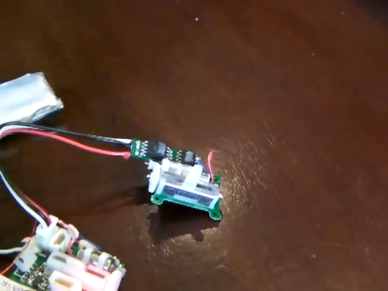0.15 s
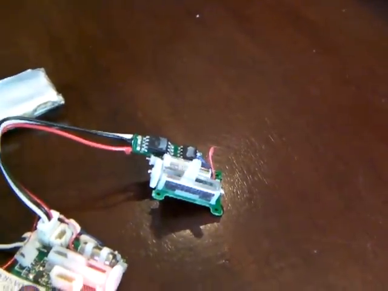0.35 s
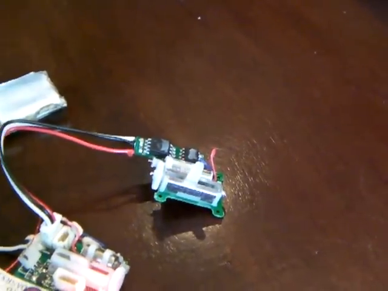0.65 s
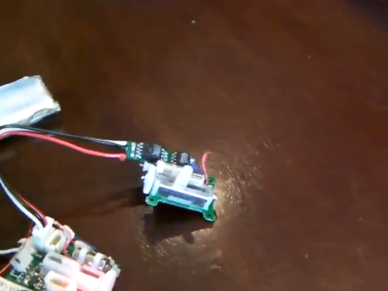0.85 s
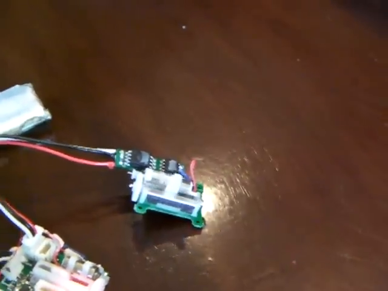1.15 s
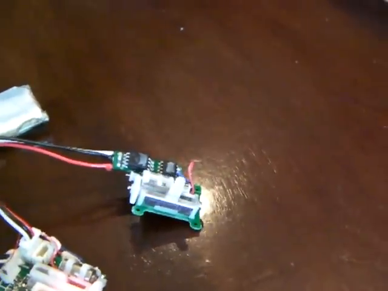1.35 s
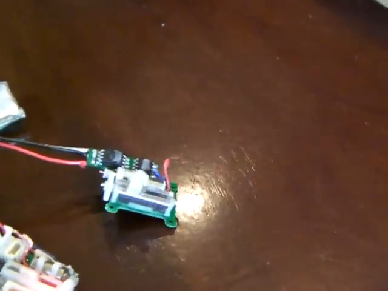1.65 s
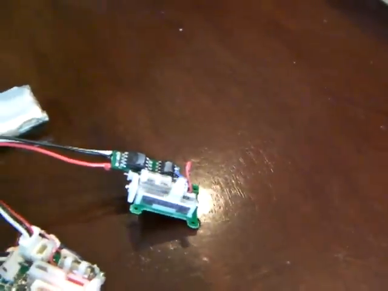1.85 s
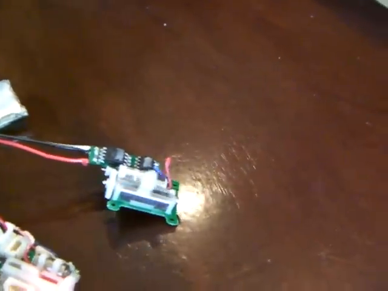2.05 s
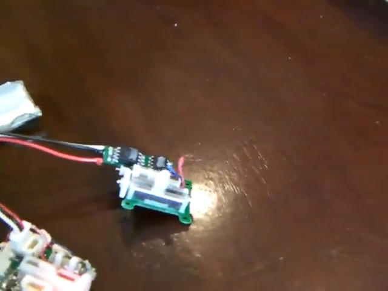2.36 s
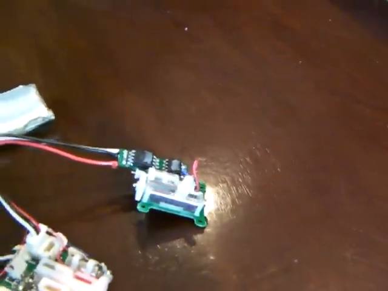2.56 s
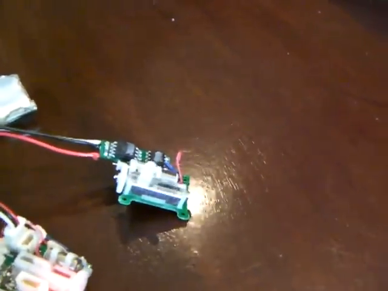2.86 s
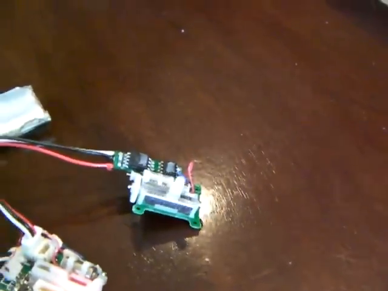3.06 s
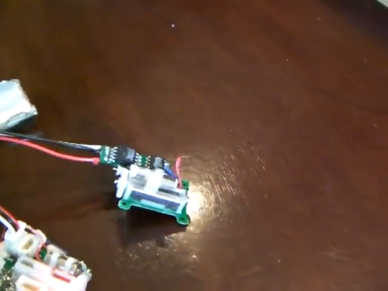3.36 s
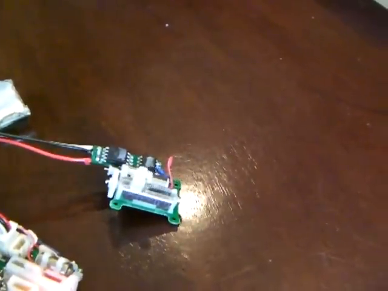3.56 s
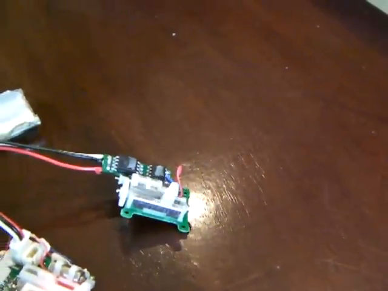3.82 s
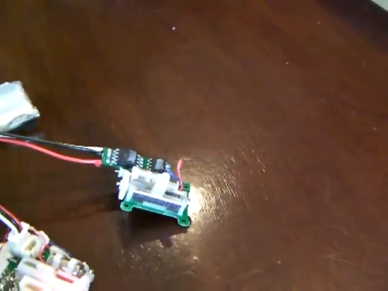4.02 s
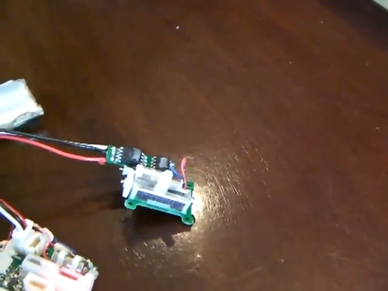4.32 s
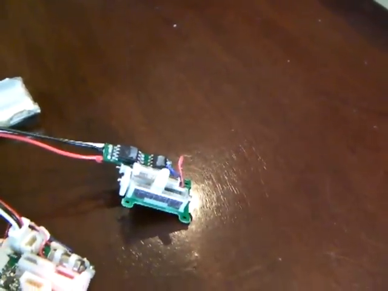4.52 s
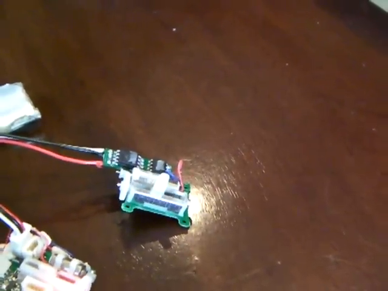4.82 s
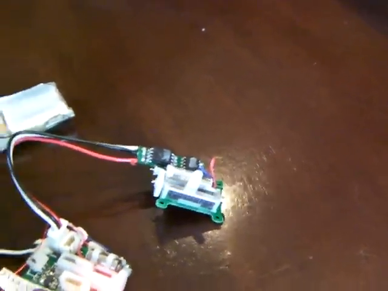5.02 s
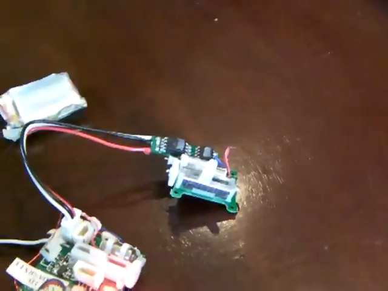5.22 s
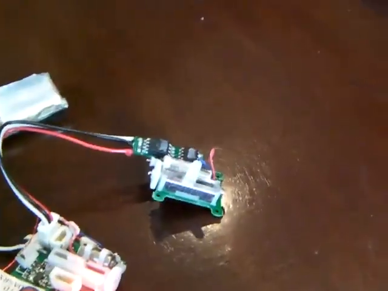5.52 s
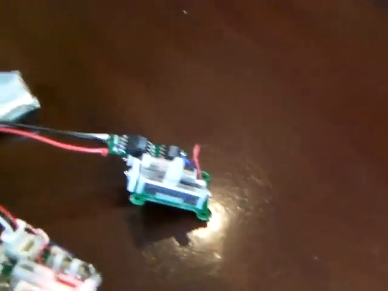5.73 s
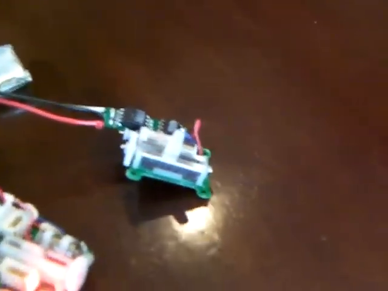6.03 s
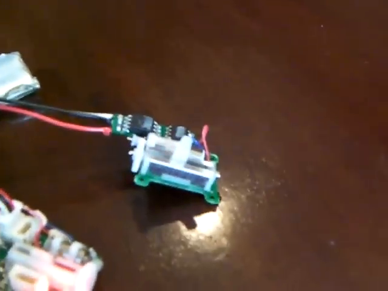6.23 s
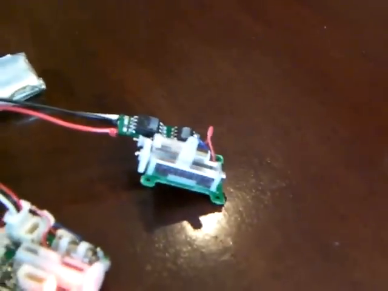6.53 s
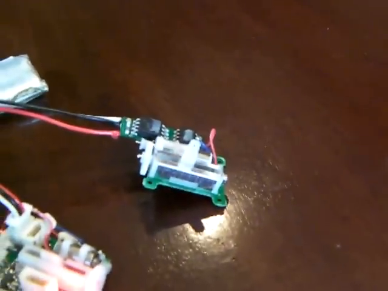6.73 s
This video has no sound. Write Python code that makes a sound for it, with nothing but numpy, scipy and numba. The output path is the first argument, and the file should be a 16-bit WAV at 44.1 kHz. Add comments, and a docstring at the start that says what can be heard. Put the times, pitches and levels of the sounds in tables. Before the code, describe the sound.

A miniature linear servo close to a stereo microphone in a small furnished room. A few brief rasping zips come first, with faint buzzing between; then rapid back-and-forth strokes crowd together for about three seconds, mixed with gear clicks and hollow plastic knocks. After that only thin broken buzzing, ticks and faint taps remain over soft air noise and low hum.

```python
"""A tiny linear servo on a wooden table drives its slider to and fro in short rasping runs, first few, then crowded.
From the start, drive pulses tick in its coil 500 times a second, over hollow taps, room air and a faint hum.
Gear teeth click as slack is taken up; dull knocks, probably the control stick at its stops, ring a plastic case.
Before and after the busy stretch the controller nudges the gears 242 times a second in bouts of hunting.
Near the end one last weak run is heard. Filtered pulses, random contacts and single clicks make the sounds."""
import sys
import numpy as np
from scipy import signal
from scipy.fft import rfft, irfft
from scipy.io import wavfile
from numba import njit

SR = 44100
rng = np.random.default_rng(int(sys.argv[2]) if len(sys.argv) > 2 else 0)


def bounce(signal):
    """Save signal as a 16-bit WAV file at the path given by the first command-line argument."""
    frames = np.transpose(np.atleast_2d(signal))
    limited = np.clip(frames, -1, 1)
    pcm = np.round(limited * 32767).astype(np.int16)
    wavfile.write(sys.argv[1], SR, pcm)


N = 303408
T = np.arange(N) / SR   # time in seconds
COIL_HZ, NUDGE_HZ = 499.76, 242.0
MID_TO_PORTS = np.array([[1], [-1]])   # a side signal enters the left and right ports with opposite sign

# resonances of the gear frame: mode_hz [Hz], width_hz [Hz], relative_db [dB]
GEAR_MODES = [(1370, 2760, -19), (3180, 490, -8), (4860, 740, -5.5), (5840, 440, -6), (7510, 880, -0.5),
              (9850, 1350, -8), (1346, 9.9, -11.5)]
# resonances of single gear teeth: mode_hz [Hz], width_hz [Hz], relative_db [dB]
TOOTH_MODES = [(9150, 2100, -6), (12120, 1240, -0.5), (13060, 1300, -4.5), (14720, 890, -5)]


def from_db(db):
    """Decibels to gain."""
    return 10 ** (np.asarray(db) / 20)


def rms_one(x):
    """Scale to unit power."""
    return x / np.sqrt(np.mean(x ** 2) + 1e-20)


def over_hz(points):
    """Spread a short spectrum over the Fourier bins, straight on a log pitch axis."""
    hz, value = np.transpose(points)
    return np.interp(np.log(np.fft.rfftfreq(N, 1 / SR) + 1), np.log(hz), value)


def gate(start, end, edge):
    """One between two moments, with sloping edges."""
    return np.clip(np.minimum(T - start, end - T) / edge + .5, 0, 1)


def drift(rate):
    """Smooth chance with unit power; rate is in new values per second."""
    knots = rng.standard_normal(int(N / SR * rate) + 2)
    return rms_one(np.interp(T * rate, np.arange(len(knots)), knots))


def ring(x, modes, vary_db=0):
    """Parallel resonances of alternating sign, with slowly shifting drive if asked; a unit click gives unit energy."""
    out, response = 0, 0
    for k, (hz, width, db) in enumerate(modes):
        r = np.exp(-np.pi * width / SR)
        b = (-1) ** k * from_db(db) * (1 - r * r) / 2 * np.array([1, 0, -1])
        a = [1, -2 * r * np.cos(2 * np.pi * hz / SR), r * r]
        share = from_db(vary_db * drift(16)) if vary_db else 1
        out = out + signal.lfilter(b, a, x * share + 1e-18)
        response = response + signal.lfilter(b, a, signal.unit_impulse(4096))
    return out / np.linalg.norm(response)


def high_pass(x, hz, order=2):
    """A small body radiates little bass."""
    return signal.sosfilt(signal.butter(order, hz, "high", fs=SR, output="sos"), x)


def band_pass(x, low_hz, high_hz):
    """Keep one band of pitches."""
    return signal.sosfilt(signal.butter(2, [low_hz, high_hz], "band", fs=SR, output="sos"), x)


def pulses(hz, jitter, wander):
    """Narrow pulses of unit power; their timing scatters by jitter seconds and slowly slides by wander seconds."""
    cycles = hz * (T + jitter * drift(400) + wander * drift(3.1))
    offset = (cycles % 1 - .5) * SR / hz   # samples from the nearest pulse
    return rms_one(np.sinc(offset) * np.exp(-(offset / 6) ** 2))


def strikes(times, db):
    """One click at each time."""
    out = np.zeros(N)
    out[(np.asarray(times) * SR).astype(int)] = from_db(db)
    return out


def contacts(per_s, size_db):
    """Dense tiny impacts of uneven size and random sign, at unit power."""
    born = rng.random(N) < per_s / SR
    size = from_db(size_db * rng.standard_normal(N))
    return rms_one(born * rng.choice([-1, 1], N) * size)


def spread(x, apart):
    """Each contact radiates its own way and so reaches the two ports with unlike strength."""
    return (x + apart * x * drift(2500) * MID_TO_PORTS) / np.sqrt(1 + apart ** 2)


def rattle(ticks, rough, length_s):
    """Loose parts follow each tick with a tiny burst of scraping; rough is its strength against the clean tick."""
    decay = np.exp(-2 * T[:200] / length_s)
    power = np.convolve(ticks ** 2, decay / decay.sum())[:N]
    scrape = np.sqrt(power) * rng.standard_normal(N)
    return (ticks + rough * scrape) / np.sqrt(1 + rough ** 2)


def gears(chatter_db=0.72, wobble_db=0.85, drive_share=0.037, coil_share=0.2,
          catch_db=6, catches_per_s=110, catch_s=0.00025):
    """Teeth and lead screw rasp as the slider travels, throbbing with the drive; catching teeth chirp at random."""
    level, treble = travel()
    catches = np.convolve(rng.random(N) < catches_per_s / SR, np.exp(-T[:300] / catch_s))[:N]
    bunch = from_db(chatter_db * drift(750) + wobble_db * drift(90) + catch_db * np.tanh(2 * catches))
    nudge_throb = drive_share * np.cos(2 * np.pi * NUDGE_HZ * T)
    coil_throb = coil_share * np.cos(2 * np.pi * COIL_HZ * T)
    bunch = rms_one(bunch * (1 + nudge_throb + coil_throb))

    frame_rasp = spread(contacts(9000, size_db=3.0), apart=0.23) * bunch * level
    screw_rasp = spread(contacts(9000, size_db=5.0), apart=0.18) * bunch * level
    tooth_rasp = spread(contacts(14000, size_db=5.5), apart=0.81) * np.sqrt(bunch) * treble
    frame = ring(frame_rasp, GEAR_MODES, vary_db=1.0)
    teeth = ring(tooth_rasp, TOOTH_MODES, vary_db=1.0)
    return from_db(-3.5) * high_pass(frame, 250) + whirr(screw_rasp) + from_db(-1.5) * high_pass(teeth, 8200)


def travel(spin_up_s=0.016, coast_s=0.019, arch_db=1.5, creep_treble_db=-2.5):
    """Rasp strength in frame and teeth: strokes spin up, swell midway and coast down; a faint creep joins them."""
    # strokes of the slider: start_s [s], length_s [s], level_db [dB], treble_db [dB against that level]
    strokes = [(0.033, 0.074, -35, -1.5), (0.098, 0.11, -37, -4), (0.207, 0.051, -33, -7),
               (0.271, 0.031, -35.5, -6), (0.471, 0.049, -38, -4), (0.789, 0.041, -45.5, -11),
               (0.867, 0.042, -37, -13), (0.931, 0.069, -35.5, -8), (1, 0.15, -33.5, -6),
               (1.037, 0.3, -35.5, -5.5), (1.418, 0.12, -36, -2), (1.544, 0.13, -35, -1.5),
               (1.713, 0.11, -33.5, -2.5), (1.835, 0.12, -33.5, -2.5), (2.052, 0.095, -33, -0.5),
               (2.182, 0.11, -32.5, 0.5), (2.301, 0.12, -31.5, -3.5), (2.447, 0.094, -32.5, -2.5),
               (2.601, 0.096, -32.5, -2), (2.756, 0.11, -31.5, -2.5), (2.932, 0.087, -30.5, -4.5),
               (3.046, 0.18, -35, -3), (3.27, 0.089, -32.5, -0.5), (3.384, 0.16, -34, -3),
               (3.611, 0.11, -33.5, -4.5), (3.724, 0.19, -35.5, -2), (3.78, 0.11, -34, -2.5),
               (3.991, 0.077, -33, 0), (4.119, 0.024, -37, -11), (5.771, 0.037, -46.5, -1)]
    # creep of the gears while the stick is waggled: time_s [s], level_db [dB]
    creep = [(0.87, -41), (1.38, -50), (1.6, -46), (1.99, -41), (2.2, -37), (2.72, -34.5), (2.9, -43),
             (3.2, -39), (3.58, -50), (4.14, -41)]
    level = gate(0.87, 4.14, edge=.01) * from_db(np.interp(T, *np.transpose(creep)))
    treble = level * from_db(creep_treble_db)
    for start, length, db, bright_db in strokes:
        spin_up = (T - start) / spin_up_s
        coast = (start + length - T) / coast_s
        running = np.clip(np.minimum(spin_up, coast) + .5, 0, 1)
        place = np.clip(2 * (T - start) / length - 1, -1, 1)   # -1 at the start, 1 at the end
        stroke = running * from_db(db + arch_db * (1.0 - place ** 2))
        level = np.maximum(level, stroke)
        treble = np.maximum(treble, stroke * from_db(bright_db))
    return level, treble


def whirr(rasp, flutter_db=3.0, waver_hz=70):
    """The rasp rings the screw in uneven spurts; its whirr sinks, broadens and climbs as the slider shifts."""
    # path of the whirr: time_s [s], centre_hz [Hz]
    path = [(0.05, 7200), (1.02, 7340), (1.12, 7000), (1.3, 7040), (1.55, 7340), (1.76, 7100), (1.87, 6840),
            (2.17, 7470), (2.34, 7140), (2.48, 6800), (2.68, 7400), (2.86, 7350), (3.12, 6660),
            (3.32, 7260), (3.5, 7200), (3.72, 6960), (3.84, 6800), (4.03, 7100)]
    top_hz, top_width_hz, broadens = 7450, 470, 0.23   # broadens: Hz of width gained per Hz sunk
    hz = np.interp(T, *np.transpose(path))
    width = top_width_hz + broadens * np.maximum(top_hz - hz, 0)
    hz = hz + waver_hz * drift(60)
    rasp = rasp * rms_one(from_db(flutter_db * drift(280)))
    screw = np.array([glide(side, hz, width) for side in rasp])
    return from_db(-5.5) * high_pass(screw, 3500)


@njit
def glide(x, hz, width):
    """One resonance whose centre and width move; it keeps the power of a white input."""
    out, state = np.zeros(len(x)), 0j
    for i in range(len(x)):
        r = np.exp(-np.pi * width[i] / SR)
        state = state * r * np.exp(2j * np.pi * hz[i] / SR) + x[i] * np.sqrt(2 * (1 - r * r))
        out[i] = state.real
    return out


def hunting(gear_rough=0.73, can_rough=0.61, rough_db=2.0, catch_db=2.6, flutter_db=2.6):
    """Each nudge rings the motor can and rattles the gears, which catch now harder, now softer."""
    # bouts of hunting around the set position: start_s [s], length_s [s], level_db [dB]
    hunts = [(0.0, 0.063, -55), (0.345, 0.2, -54.5), (0.59, 0.37, -53.5), (4.14, 0.33, -54.5),
             (4.504, 0.33, -52.5), (4.864, 0.067, -57.5), (4.95, 0.24, -60), (5.204, 0.019, -52),
             (5.254, 0.065, -53), (5.333, 0.31, -57), (5.638, 0.19, -56), (5.836, 0.2, -58.5),
             (6.045, 0.16, -58), (6.284, 0.034, -56), (6.39, 0.13, -58.5), (6.518, 0.34, -55)]
    # gear resonances under the nudges: mode_hz [Hz], width_hz [Hz], relative_db [dB]
    nudge_modes = [(2990, 270, -7.5), (4800, 430, -2.5), (5760, 380, -5), (7150, 520, 3.5),
                   (8400, 510, -2.5)]
    # ring of the motor can: mode_hz [Hz], width_hz [Hz], relative_db [dB]
    can_modes = [(10020, 490, 0)]
    awake = sum(gate(start, start + length, edge=0.00076) for start, length, _ in hunts)
    effort = sum(from_db(db) * gate(start, start + length, edge=0.018) for start, length, db in hunts)
    awake = awake * (drift(90) > -1.2)   # now and then a nudge is skipped
    nudges = pulses(NUDGE_HZ, jitter=8e-6, wander=4e-5) * awake

    grip = effort * from_db(rough_db * drift(240) + catch_db * drift(45))
    gear_rattle = spread(rattle(nudges, gear_rough, length_s=0.0006), apart=0.26)
    frame = ring(gear_rattle * grip, nudge_modes, vary_db=3.0)

    flutter = from_db(-57 + 0.7 * T + flutter_db * drift(110))   # grows 0.7 dB per second
    can_rattle = spread(rattle(nudges, can_rough, length_s=0.00029), apart=0.27)
    can = band_pass(ring(can_rattle * flutter, can_modes), 9000, 11000)
    return from_db(1.0) * high_pass(frame, 1300) + can


def coil(uneven_db=1.2, shift_db=1.0, rough=.4):
    """Drive pulses tick in the winding, slowly louder; under strain they rattle the gear frame in an even buzz."""
    # the motor pushes without turning: start_s [s], end_s [s], level_db [dB]
    strains = [(1.27, 1.42, -41), (1.68, 1.712, -46), (1.955, 2.02, -44), (2.885, 2.934, -42),
               (3.23, 3.27, -45), (3.55, 3.578, -45), (3.915, 3.992, -42), (4.542, 4.625, -44.5),
               (4.648, 4.795, -43)]
    # resonances of the ticking coil: mode_hz [Hz], width_hz [Hz], relative_db [dB]
    coil_modes = [(7400, 610, -11), (8700, 1000, -20.5), (11350, 880, -3), (12430, 1600, -3),
                  (12900, 680, 0), (14470, 760, -11.5)]
    # resonances of the strained frame: mode_hz [Hz], width_hz [Hz], relative_db [dB]
    strain_modes = [(4300, 890, -5), (7320, 490, 9.5), (8300, 830, 6.5), (11700, 1250, 11.5),
                    (13350, 1400, 10), (14700, 1700, -1)]
    ticks = pulses(COIL_HZ, jitter=2.8e-6, wander=4e-5) * from_db(drift(280))
    tick_level = from_db(-55 + 0.6 * T)   # grows 0.6 dB per second
    idle = ring(spread(ticks, apart=0.13) * tick_level, coil_modes, vary_db=0.3)

    effort = sum(from_db(level_db) * gate(start, end, edge=0.0051) for start, end, level_db in strains)
    shoves = rattle(pulses(COIL_HZ, jitter=5e-6, wander=3e-5), rough, length_s=0.00056)
    shoves = shoves * from_db(uneven_db * drift(290))
    strain = ring(spread(shoves, apart=0.12) * effort, strain_modes, vary_db=shift_db)
    return high_pass(idle, 5700) + from_db(-1.0) * high_pass(strain, 1900)


def backlash(scuff_s=0.001):
    """A tooth crosses its slack and lands with a very short scuff."""
    # gear clicks: time_s [s], frame_db [dB of energy], tooth_db [dB of tooth ring against the frame]
    clicks = [(0.283, -6.5, -13), (0.288, -23, -16), (0.3046, -8, -5), (0.322, -10, -11),
              (0.6938, -18, -13), (0.719, -24, -2), (0.7393, -13.5, -4), (1.0716, -8, -12),
              (1.571, -5.5, -14), (1.691, -11, 2), (1.8653, -11.5, -11), (2.5273, -6, -13),
              (2.8602, -4.5, -5), (2.8817, -14, 3), (3.063, -11, -9), (3.3135, -16, 0), (3.481, -12, 5),
              (3.575, -15, 3), (3.5967, -11, -5), (3.618, -8.5, -7), (3.828, -9, 1), (3.997, -28, 16),
              (4.258, -15, 0), (4.2626, -22, 5), (4.511, -22, -4), (4.513, -22, -4), (4.543, -19, 4),
              (4.7872, -21, 1), (4.79, -17.5, 4), (5.073, -17, -9), (5.3884, -15, 5), (5.5767, -17.5, -12),
              (6.8, -15.5, 9)]
    s, frame_db, tooth_db = np.transpose(clicks)
    scuff = (T[:200] / scuff_s) * np.exp(-2 * T[:200] / scuff_s)
    scuff /= np.linalg.norm(scuff)
    grain = spread(rng.choice([-1, 1], N), apart=0.084)
    frame_scuffs = np.convolve(strikes(s, frame_db), scuff)[:N]
    tooth_scuffs = np.convolve(strikes(s, frame_db + tooth_db), scuff)[:N]
    frame = ring(grain * frame_scuffs, GEAR_MODES)
    teeth = ring(grain * tooth_scuffs, TOOTH_MODES)
    return from_db(-1.2) * high_pass(frame + teeth, 3800, order=4)


def stick(vary_db=0.4, steepness=5.5, echo_s=0.012):
    """Knocks ring a hollow case, soft ones without high modes; a duller early echo off desk and room follows each."""
    # knocks: time_s [s], force_db [dB], spot_hz [Hz the struck spot favours], reach_hz [Hz the contact reaches],
    # thump_db [dB of low thump of the whole case], echo_db [dB against the direct knock]
    knocks = [(0.245, -12, 590, 720, -21, -7.5), (1.1758, -9, 566, 1080, -33, -5.5),
              (1.488, -14.5, 463, 1460, -28.5, -3.5), (1.7863, -9.5, 480, 1300, -37, -5.5),
              (2.1121, -12, 675, 1800, -29, -4), (2.1996, -17.5, 434, 1300, -27.5, -1),
              (2.3273, -6.5, 660, 2100, -34, -11), (2.379, -7.5, 470, 1680, -30, -9),
              (2.4732, -12.5, 410, 1420, -28, -4.5), (2.672, -14.5, 423, 1260, -31, -1),
              (2.7732, -3, 457, 670, -26, -3.5), (2.9558, -14, 580, 620, -34, -11),
              (3.0102, -8.5, 590, 1190, -38, -4.5), (3.1497, -13.5, 720, 850, -29, -5.5),
              (3.334, -14.5, 460, 1100, -32, -3), (3.4446, -4, 760, 1390, -21, -9.5),
              (3.5489, -20.5, 430, 756, -44, -21), (3.7054, -10, 533, 1170, -28, -3.5),
              (3.8634, -14, 630, 740, -31, -5), (4.2355, -23.5, 450, 1120, -26, -1),
              (5.6052, -14.5, 524, 486, -50, -29), (5.8695, -22, 554, 527, -44, -18),
              (5.929, -23.5, 560, 530, -44, -21), (6.154, -32, 700, 696, -50, -13),
              (6.8454, -28, 413, 545, -45, 0)]
    # the case that is knocked: mode_hz [Hz], width_hz [Hz], relative_db [dB]
    knock_modes = [(387, 55, -9.5), (440.3, 22.4, -2), (536, 140, -3.5), (593, 58, -4), (718, 67, -2),
                   (810, 58, -5), (1040, 100, -6.5), (1270, 53, -6), (1590, 160, -8.5), (1880, 280, -8)]
    # low thump of the whole case: mode_hz [Hz], width_hz [Hz], relative_db [dB]
    thump_modes = [(149, 42, 1), (245, 16, 8.5)]
    favour_db, favour_octaves = 5, 0.092
    thin_db_per_octave, echo_dull_db_per_octave = 13, 5.5
    s, force_db, spot_hz, reach_hz, thump_db, echo_db = np.transpose(knocks)
    later = s + echo_s * rng.uniform(.85, 1.15, len(s))
    out = 0
    for k, (hz, width, db) in enumerate(knock_modes):
        soft_db = -10 * np.log10(1 + (hz / reach_hz) ** steepness)
        spot_db = favour_db * np.exp(-(np.log2(hz / spot_hz) / favour_octaves) ** 2)
        hit_db = force_db + soft_db + vary_db * rng.standard_normal(len(s))
        # the direct knock favours modes near its own pitch; the echo is duller and rings the low ones
        thin_db = -thin_db_per_octave * np.maximum(np.log2(spot_hz / hz), 0)
        dull_db = -echo_dull_db_per_octave * np.log2(hz / 600)
        direct = strikes(s, hit_db + spot_db + thin_db)
        echo = strikes(later, hit_db + soft_db + echo_db + dull_db)
        # each mode first swings either way, and takes about a cycle to build up
        mode = ring((direct + echo) * rng.choice([-1, 1], N), [(hz, width, 0)])
        out = out + from_db(db) * band_pass(mode, .62 * hz, 1.42 * hz)
    thump = band_pass(ring(strikes(s, thump_db), thump_modes), 120, 330)
    return from_db(-2.5) * high_pass(out, 276, order=3) + thump


def patter(vary_db=1.5, faint_db=-60.5, every_s=0.0502, tap_hz=402.4, tap_length_s=0.01498):
    """A hollow tapping, twenty a second and mostly very faint; each tap swells and stops within a few cycles."""
    # the clearer of the hollow taps: time_s [s], peak_db [dB]
    clear_taps = [(0.017, -47), (0.067, -47.5), (0.118, -49), (0.214, -49), (0.323, -51), (0.725, -47),
                  (1.155, -44.5), (1.229, -56), (1.271, -50), (1.419, -44), (1.569, -43.5), (1.62, -45.5),
                  (1.756, -44), (1.853, -52), (1.904, -52), (2.003, -43.5), (2.055, -43), (2.321, -37.5),
                  (2.368, -43), (2.418, -40), (2.568, -44), (2.621, -42), (3.24, -45), (3.937, -53.5),
                  (3.987, -45.5), (4.305, -49), (4.357, -52), (4.408, -45), (4.458, -48), (4.506, -46),
                  (5.085, -57), (5.13, -52), (5.232, -50), (5.496, -59), (5.54, -51), (5.731, -52),
                  (6.203, -49), (6.259, -47), (6.307, -49), (6.358, -46), (6.409, -44.5), (6.629, -53),
                  (6.781, -50)]
    s, db = np.transpose(clear_taps)
    beat = np.arange(.016, T[-1] - every_s, every_s)
    nearest_s = np.abs(beat[:, None] - s).min(axis=1)
    beat = beat[nearest_s > .7 * every_s]   # a clear tap takes the place of a faint one
    hits = strikes(s, db) + strikes(beat, faint_db + vary_db * rng.standard_normal(len(beat)))
    time = T[T < tap_length_s]
    tap = np.sin(np.pi * time / tap_length_s) ** 2 * np.sin(2 * np.pi * tap_hz * time)
    return signal.fftconvolve(hits, tap, "same")


def room(x, t60, apart):
    """Diffuse reflections of a small furnished room: noise that dies by 60 dB in t60 seconds."""
    time = T[:SR // 2]
    mid, side = rng.standard_normal((2, len(time))) * from_db(-60 * time / t60) * (time > .004)
    echo = (mid + apart * side * MID_TO_PORTS) / np.linalg.norm(mid)
    return signal.fftconvolve(np.atleast_2d(x), echo, axes=1)[:, :N]


def background(waver_db=1.2):
    """Soft air noise, shaped in spectrum, and the wavering hum of a distant fan, made of sines."""
    # room air: pitch_hz [Hz], density_db [relative dB per Hz]
    air_spectrum = [(25, -28), (50, -5), (65, -4.5), (95, 3.5), (130, -4.5), (200, -1.5), (290, -8),
                    (410, 4.5), (550, -3), (1000, -7), (2200, -13.5), (6000, -12), (12000, -9.5),
                    (16000, -53)]
    # steady hum tones: pitch_hz [Hz], level_db [dB]
    hum_tones = [(95.9, -63.5), (204, -70.5)]
    noise = rfft(rng.standard_normal((2, N)))
    mid, side = rms_one(irfft(noise * from_db(over_hz(air_spectrum)), N))
    air = from_db(-55.5 + 1.15 * drift(22)) * (mid + 0.49 * side * MID_TO_PORTS)
    hum = 0
    for hz, db in hum_tones:
        level = from_db(db + waver_db * drift(8.8)) * np.sqrt(2)
        hum = hum + level * np.sin(2 * np.pi * hz * T + 0.87 * drift(8))
    return air + hum


def scene():
    """The servo is close and a little to one side, so the two microphone ports colour it differently."""
    # balance of the two ports: pitch_hz [Hz], difference_db [dB, left minus right]
    balance = [(500, 1.5), (2800, 0), (3700, 4), (4800, 0), (6400, -4.5), (7350, 0), (8100, -1.5),
               (9400, 2.5), (11000, 0.5), (13200, 1.5), (14300, -1), (15300, 0)]
    # timing of the two ports: pitch_hz [Hz], lead_rad [radians by which left leads]
    port_lead = [(500, 0.72), (3500, -0.41), (4200, -1.4), (6000, -0.58), (6900, -1.07), (7800, 0.89),
                 (8700, -0.64), (9800, -0.9), (12000, -1.27), (16000, -1.4)]
    servo = gears() + hunting() + coil() + backlash()
    half = from_db(over_hz(balance) / 2) * np.exp(.5j * over_hz(port_lead))
    servo = irfft(rfft(servo) * np.array([half, 1 / half]), N)
    knocks = stick() + patter()
    near = servo + knocks + background()
    servo_room = from_db(-12.5) * room(servo, t60=0.29, apart=0.49)
    knock_room = from_db(-9.5) * room(knocks, t60=0.32, apart=0.51)
    return near + servo_room + knock_room


def record(dry):
    """The microphone has one narrow notch in the treble; the top is cut."""
    notch_hz, cutoff_hz = 7900, 15850
    notched = signal.lfilter(*signal.iirnotch(notch_hz, 22, fs=SR), dry)
    return signal.sosfilt(signal.ellip(12, .1, 80, cutoff_hz, fs=SR, output="sos"), notched)


dry = scene()
out = record(dry)
bounce(out)
```